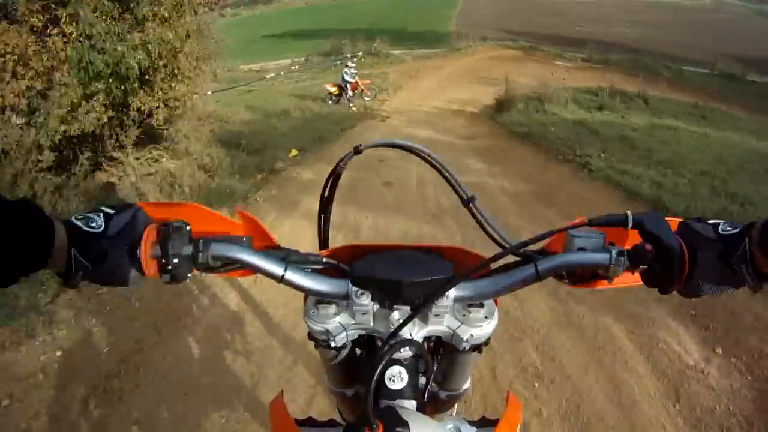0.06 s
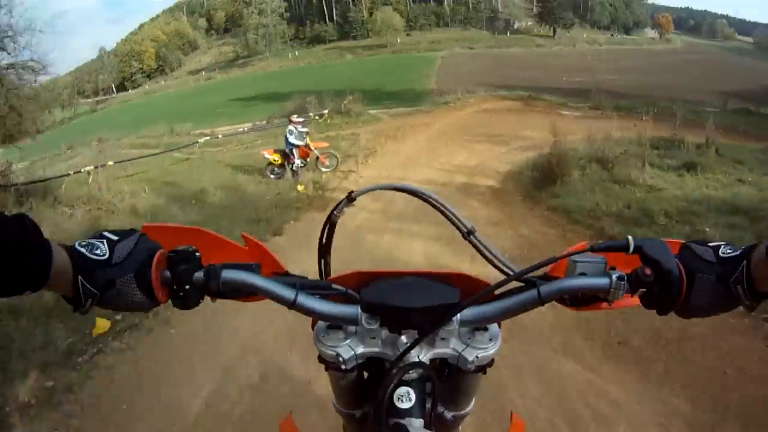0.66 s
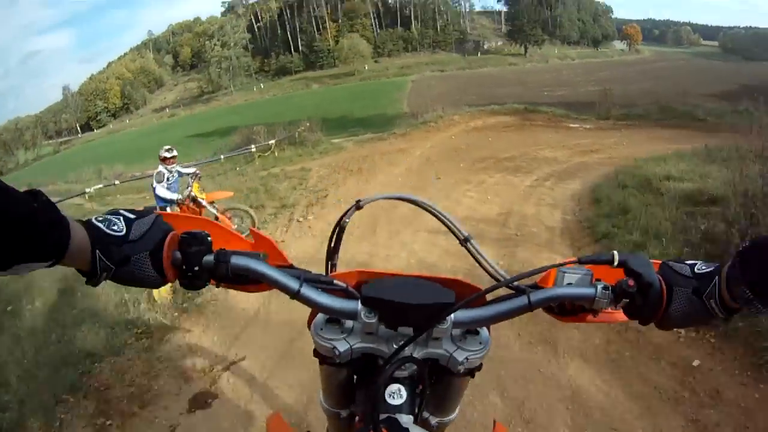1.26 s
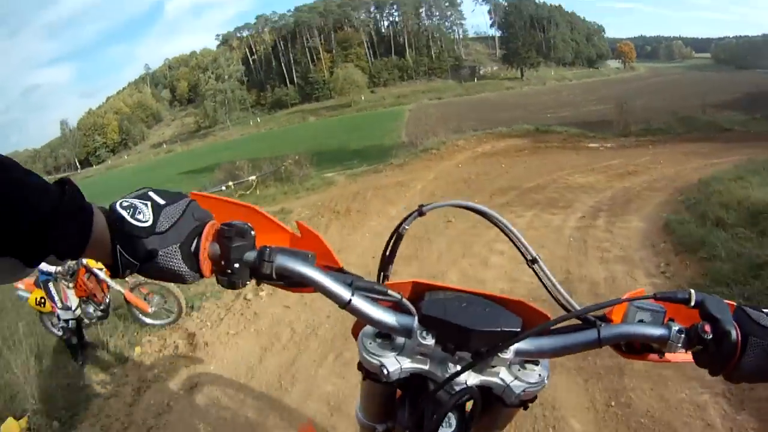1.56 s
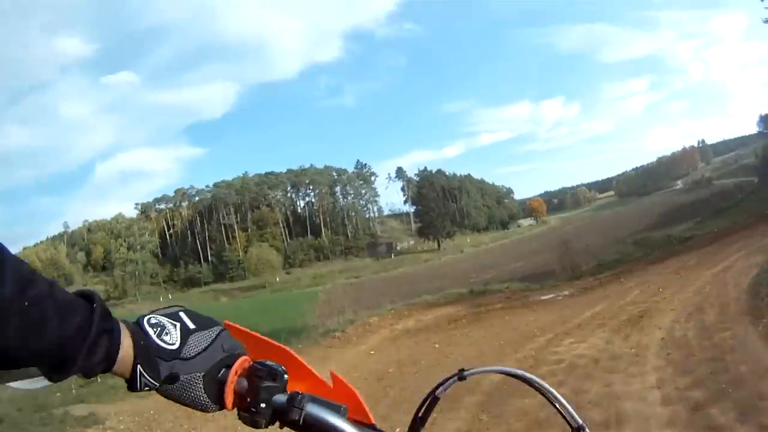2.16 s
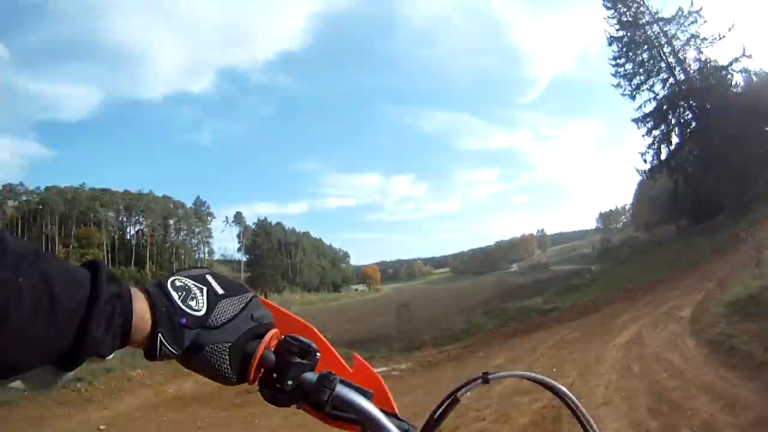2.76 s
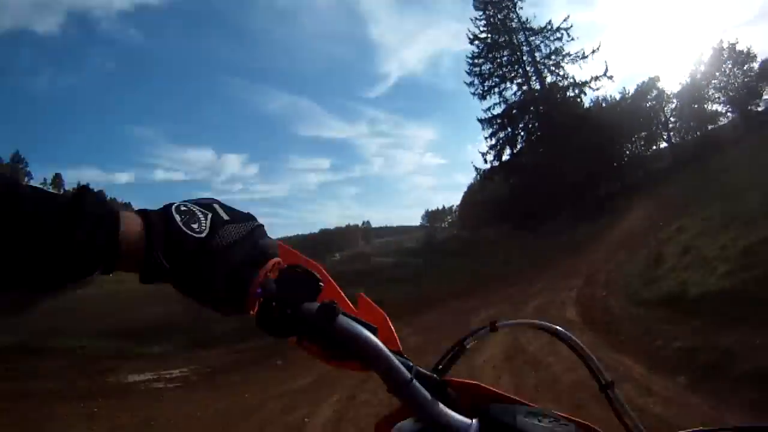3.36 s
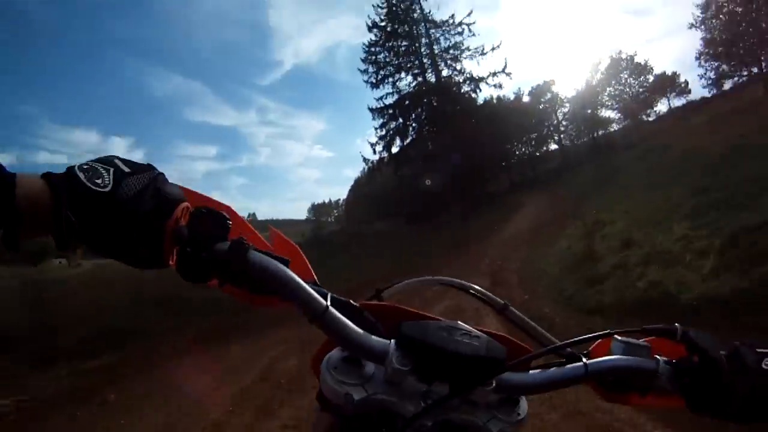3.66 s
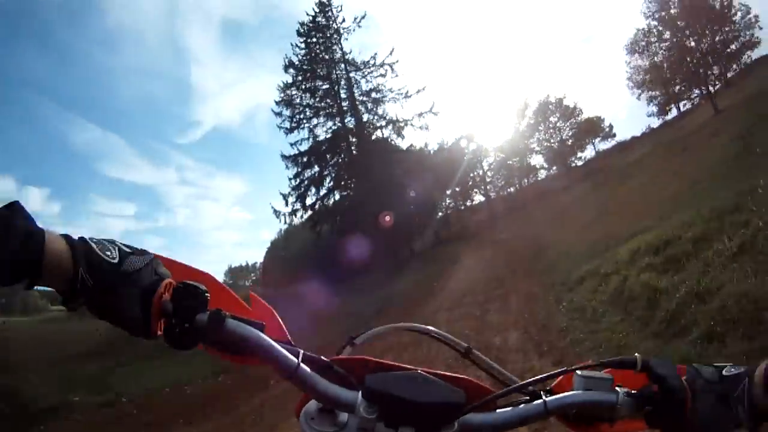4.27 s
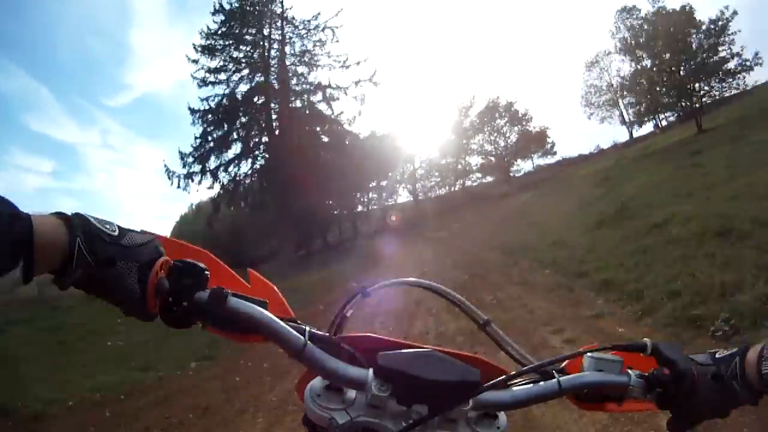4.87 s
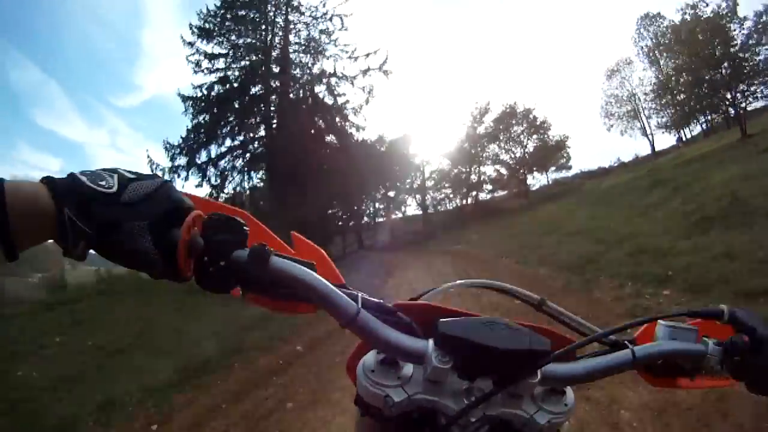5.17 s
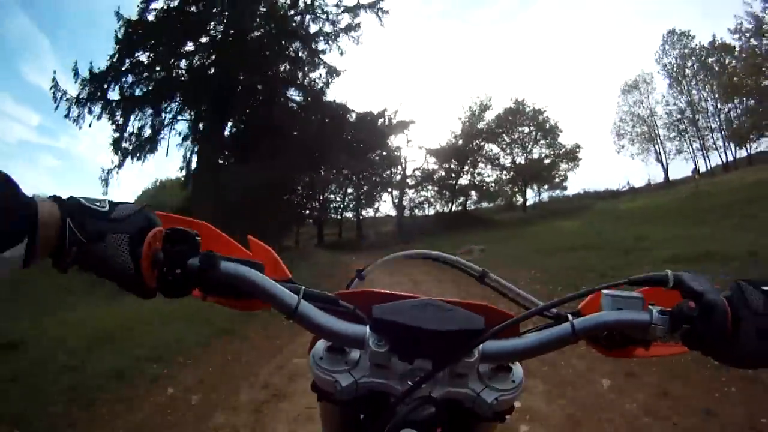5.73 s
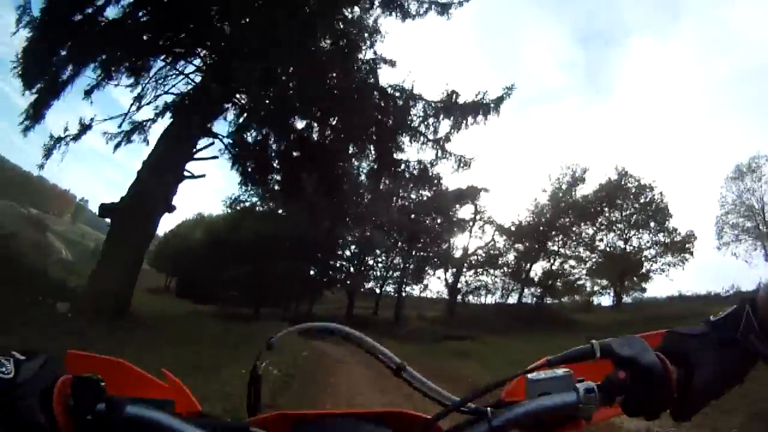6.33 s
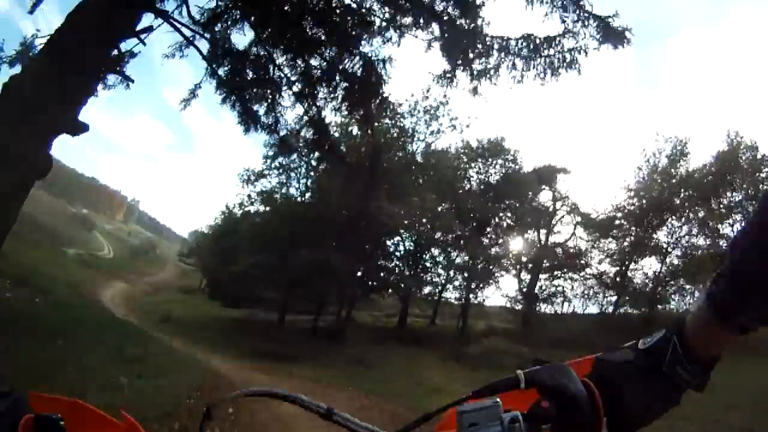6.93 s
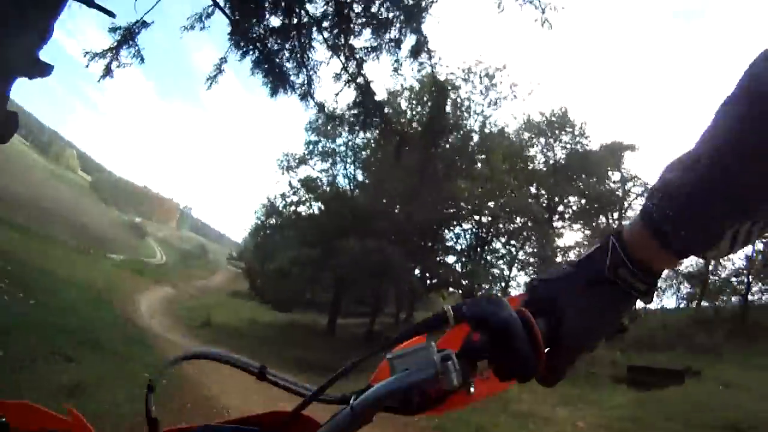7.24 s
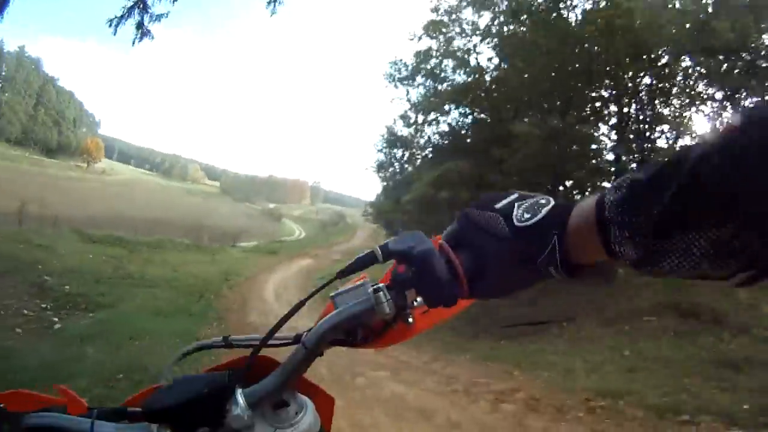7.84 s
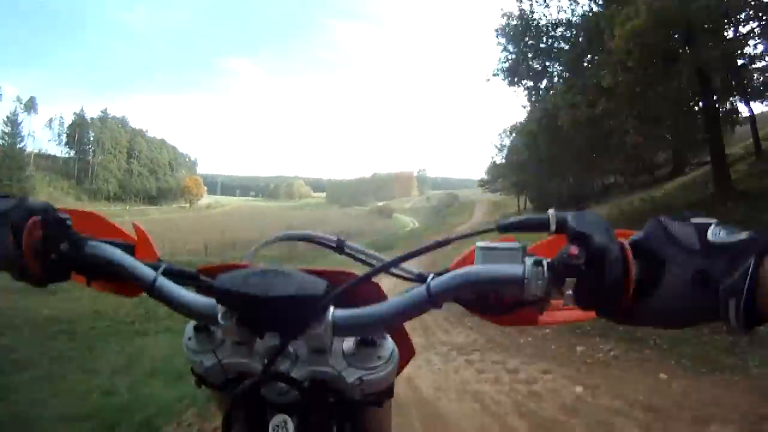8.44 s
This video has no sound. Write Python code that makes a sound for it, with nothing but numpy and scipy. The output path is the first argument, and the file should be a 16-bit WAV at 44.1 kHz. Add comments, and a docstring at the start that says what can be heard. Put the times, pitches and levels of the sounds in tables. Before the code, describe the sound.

A two-stroke dirt bike is heard close up from a microphone on the rider, with low, lumpy wind buffeting and a thin treble fizz. For the first 3.4 seconds it coasts, its engine humming and gradually slowing while the frame rattles. The slack chain slaps sharply, most densely in the first second, and the exhaust pops irregularly, more often from about 2.4 seconds. At 3.4 seconds the throttle opens and the engine rises with a metallic rasp. It breaks briefly with a pop for a gear change around 4.4 seconds, then climbs higher, the revs flaring unevenly, to a peak at 6.1 seconds. The throttle shuts and the revs fall, with stronger wind, more chain slaps and a few soft thuds between 6.2 and 7.5 seconds. At 7.6 seconds the engine pops and pulls again, rising around 8.2 seconds and holding until the end.

```python
"""Wind buffeting and the hum and clatter of a coasting two-stroke dirt bike, heard from a cased camera
on the rider. The slack chain slaps over braking bumps and unburnt mixture pops in the pipe. The bike
pulls through two gears, coasts with a few thuds and pulls again: one pressure pulse per revolution
drives the resonances of airbox, exhaust and steel expansion chamber. The camera holds each sample at
12 kHz, and the spectral images this makes are heard as a thin treble fizz."""
import sys
import numpy as np
from scipy import signal
from scipy.fft import rfft, irfft
from scipy.io import wavfile
from scipy.ndimage import uniform_filter1d

SR = 44100
rng = np.random.default_rng(int(sys.argv[2]) if len(sys.argv) > 2 else 0)


def bounce(signal):
    """Save signal as a 16-bit WAV file at the path given by the first command-line argument."""
    frames = np.transpose(np.atleast_2d(signal))
    limited = np.clip(frames, -1, 1)
    pcm = np.round(limited * 32767).astype(np.int16)
    wavfile.write(sys.argv[1], SR, pcm)


N = 383669
T = np.arange(N) / SR

# Levels in the tables are relative; a spectrum gives only the shape of a filter.
# trend of the engine speed, climbing in each pull: t/s, speed/(rev/s)
SPEED_TREND = [(0, 57), (.33, 55), (.6, 43.5), (.95, 46), (1.28, 54), (1.6, 48), (1.8, 50), (2.08, 41.5),
               (3.28, 35.5), (3.45, 45.8), (3.77, 54), (4.31, 75.1), (4.48, 58.9), (4.95, 65.1),
               (5.5, 75.2), (6.11, 89.1), (6.45, 61), (6.69, 57), (6.84, 46), (7.2, 39), (7.6, 40),
               (7.645, 50), (8.04, 50.9), (8.25, 57.4), (8.34, 73.5), (8.7, 74.1)]
# the rear wheel spins up over a bump, or bites: t/s, added speed/(rev/s), half length/s
WHEEL_FLARES = [(3.657, 2.5, .053), (3.755, -2, .055), (4.139, 2.1, .028), (4.687, 3.2, .055),
                (4.824, 5.8, .046), (5.034, 8.2, .071), (5.229, 13.3, .055), (5.372, 11.8, .04),
                (5.581, 7.6, .081), (5.731, 8.2, .047), (5.867, 10.8, .038), (5.956, 6.3, .029),
                (6.046, 5.3, .026), (8.156, 13.3, .055), (8.416, 3.1, .017), (8.548, -5.5, .037)]
# the coasting hum swells as it passes through the airbox resonance: f/Hz, level/dB
HUM_RESPONSE = [(72, -28), (87, -29), (99, -20.5), (110, -20), (122, -21.5), (140, -18.5), (172, -43)]
# pipe resonances rung by stray firings: f/Hz, bandwidth/Hz, level/dB
PIPE_MODES = [(129, 51, -0.5), (289, 73.4, 6), (476, 200, -7)]
# rumble of frame and tyres: f/Hz, level/dB
RUMBLE_SPECTRUM = [(76, -22), (130, 1), (210, -4), (304, -1), (364, -8.5), (446, -2), (483, -10),
                   (539, -7.5), (709, -29.5), (850, -24.5), (1100, -50), (1870, -120)]
# resonances of cylinder and engine cases: f/Hz, bandwidth/Hz, level/dB
CASE_MODES = [(1328, 67, -2), (1584, 53, 4.5), (2110, 490, -8.5)]
# clatter of chain and frame: f/Hz, level/dB
CLATTER_SPECTRUM = [(410, -24), (700, -27.5), (884, -7), (1160, -4), (1270, 1.5), (1450, -5), (1570, 0.5),
                    (1700, -1.5), (2510, -0.5), (2770, -7), (3730, -7.5), (4340, -19.5), (4880, -17.5),
                    (6000, -29), (7800, -47), (13200, -120)]
# strength of the wind on the camera case: t/s, level/dB
WIND_LEVELS = [(0, -14), (.58, -21.5), (.85, -31), (1.15, -24.5), (2.25, -21.5), (2.8, -26.5),
               (3.15, -29.5), (4.22, -39), (4.36, -25.5), (4.6, -33), (5.1, -25.5), (6.0, -32.5),
               (6.24, -20.5), (7.15, -23), (7.53, -23), (7.72, -25), (8.03, -27), (8.25, -39), (8.7, -23)]
# wind buffeting: f/Hz, level/dB
BUFFET_SPECTRUM = [(12, 3), (25, -11), (50, -2), (90, -5.5), (160, -10), (300, -26.5), (700, -28)]
# hard chain slaps: t/s, level/dB
HARD_SLAPS = [(0.236, -7.5), (0.3092, -7.5), (0.424, -5), (0.5568, -6), (0.589, -4.5), (0.634, 1),
              (0.6727, -9), (0.712, -8), (0.751, -3.5), (0.793, -1.5), (0.832, -8), (0.8776, 1),
              (0.9233, -6), (0.9694, -1.5), (1.181, -9.5), (1.5665, -1.5), (1.6253, -11), (1.922, -9.5),
              (1.9905, -9), (2.478, -14), (2.597, -5.5), (2.653, -9.5), (2.733, -15), (2.913, -13),
              (2.9505, -7.5), (6.4557, -8), (6.4935, -7.5), (6.7488, -10.5), (6.805, -11.5), (6.861, -8),
              (6.936, -11), (6.9908, -2), (7.1062, -5), (7.8052, -14)]
# ring of a chain slap: f/Hz, level/dB
SLAP_SPECTRUM = [(200, 6), (450, 13), (750, -15.5), (1300, 1.5), (1700, 3.5), (2500, 4), (2800, -1.5),
                 (3500, 2.5), (4300, -9), (5000, -11.5), (6000, -19.5)]
# stray firings banging in the pipe: t/s, level/dB
STRAY_FIRINGS = [(0.44, -5), (0.637, -10), (0.796, -7), (0.968, -7), (1.066, 1.5), (1.234, -2), (1.566, -3),
                 (1.904, -2.5), (2.384, -6), (2.556, -2), (2.707, -6), (2.732, -1.5), (2.892, -7),
                 (2.958, 2), (3.095, -4), (3.146, -5), (3.254, -7), (3.28, 1), (3.374, -4.5), (3.44, 0),
                 (4.4625, 2), (7.602, -3), (7.633, 2.5), (7.674, -1), (7.852, 1), (7.895, 2)]
# brief dips in level, mostly after a bang (a negative depth is a lift): t/s, depth/dB
LEVEL_DIPS = [(.48, 2.5), (1.073, 7.5), (1.59, 2), (2.79, 5), (2.975, 6.5), (3.3, 8), (4.484, 7.5),
              (6.11, -2.5), (6.517, 8.5), (6.615, 3), (7.03, 6), (7.155, 5.5), (7.648, 2.5)]
# spans of open throttle: start t/s, end t/s, honk level/dB, rasp level/dB
PULL_SPANS = [(3.449, 4.305, -18, -29.5), (4.451, 6.11, -17, -28.5), (7.638, 8.75, -15, -29.5)]
# the rider's hand during the pulls: t/s, throttle opening (0-1)
THROTTLE_OPENING = [(3.45, 0.27), (3.55, 0.3), (3.85, 0.8), (4.05, 0.51), (4.3, 0.34), (4.48, 0.8),
                    (5.0, 0.39), (5.24, 0.5), (5.3, 0.32), (5.36, 0.54), (5.88, 0.89), (6.1, 0.65),
                    (7.645, 0.32), (7.82, 0.13), (7.93, 0.48), (8.25, 0.53), (8.4, 0.33), (8.7, 0.42)]
# low resonances of the airbox: f/Hz, level/dB
AIRBOX_SPECTRUM = [(55, -35), (80, -14.5), (100, -9.5), (150, -9), (175, -6), (205, -7.5), (245, 3),
                   (300, -2.5), (321, -11.5), (340, -5.5), (365, -11.5), (400, -19), (520, -17)]
# higher resonance of the exhaust: f/Hz, level/dB
EXHAUST_SPECTRUM = [(330, -29), (390, -14), (430, 8.5), (465, 10), (505, 3.5), (540, -15), (620, -16),
                    (700, -33), (850, -29.5), (1100, -41)]
# wall resonances of the steel expansion chamber: f/Hz, bandwidth/Hz, level/dB
STEEL_MODES = [(1660, 34, -4.5), (1965, 112, 3), (2288, 296, -4)]
# metallic rasp of the firings: f/Hz, level/dB
RASP_SPECTRUM = [(440, -34), (750, -16), (797, -7), (949, -7), (1090, -7.5), (1440, -4.5), (1990, -2.5),
                 (2190, 0), (2450, -3), (2720, -11), (3410, -7.5), (3720, -13.5), (5040, -22), (6000, -30),
                 (7800, -77), (13200, -120)]
# the suspension takes a hole: t/s, level/dB
LANDINGS = [(6.204, -3.5), (6.498, 1.5), (7.296, -11), (7.515, -7)]

PULL_REVS, COAST_REVS, IDLE_REVS = 65, 45, 38  # reference speeds in rev/s


def from_db(db):
    """Amplitude ratio of a level."""
    return 10 ** (np.asarray(db) / 20)


def rms_one(x):
    """Normalisation to unit rms."""
    return x / np.sqrt(np.mean(x ** 2) + 1e-20)


def evened(x, window_s):
    """Normalisation to unit rms over a sliding window."""
    return x / np.sqrt(np.abs(uniform_filter1d(x * x, int(window_s * SR))) + 1e-12)


def in_time(rows):
    """Linear interpolation of each column at every sample."""
    s, *columns = np.transpose(rows)
    return [np.interp(T, s, c) for c in columns]


def drift(rate_hz):
    """Low-passed noise: a slow random fluctuation of unit rms."""
    step = 40  # samples per noise value
    r = np.exp(-2 * np.pi * rate_hz * step / SR)
    slow = signal.lfilter([1], [1, -2 * r, r * r], rng.standard_normal(N // step + 2002))[2000:]
    return np.interp(np.arange(N) / step, np.arange(len(slow)), rms_one(slow))


def coloured(x, spectrum, size=8192):
    """Minimum-phase filter of unit energy: follows a spectrum, falling 30 dB/octave past its ends."""
    hz, db = np.transpose(spectrum)
    octave, known = np.log2(np.arange(size // 2 + 1) * SR / size + 1), np.log2(hz)
    gain_db = np.interp(octave, known, db) - 30 * np.abs(octave - np.clip(octave, known[0], known[-1]))
    cepstrum = irfft(np.log(from_db(gain_db) + 1e-5))
    response = irfft(np.exp(rfft(2 * cepstrum[:size // 2], size)))
    return signal.oaconvolve(x, response / np.linalg.norm(response))[:N]


def resonate(x, modes, damping):
    """Modal superposition: parallel resonators of alternating sign; damping scales their bandwidths."""
    out = 0
    for k, (hz, width, db) in enumerate(modes):
        r = np.exp(-np.pi * width * damping / SR)
        poles = [1, -2 * r * np.cos(2 * np.pi * hz / SR), r * r]
        out = out + (-1) ** k * from_db(db) * signal.lfilter([1 - r, 0, r - 1], poles, x)
    return out


def engine_speed():
    """The firing frequency in rev/s: a trend with a Gaussian flare at each bump."""
    trend, = in_time(SPEED_TREND)
    return trend + sum(extra * np.exp(-((T - s) / half_s) ** 2) for s, extra, half_s in WHEEL_FLARES)


def firings(turns, spread_db, jitter_s):
    """A pulse train, one per revolution; uneven strength and timing put noise between its harmonics."""
    at = np.flatnonzero(np.diff(np.floor(turns)) > 0)
    strength, delay = np.clip(rng.standard_normal((len(at), 2)), -2, 2).T
    jittered = np.clip(at + (delay * jitter_s[at] * SR).astype(int), 0, N - 1)
    pulses = np.full(N, 1e-18)
    pulses[jittered] = from_db(strength * spread_db[at])
    return pulses


def once_a_turn(turns, depth_db):
    """Amplitude modulation at the rotation frequency, of unit rms."""
    return rms_one(from_db(depth_db * np.cos(2 * np.pi * turns)))


def chamber(x, return_s, share):
    """Reflection in the expansion chamber smears each pulse without colouring it (an allpass)."""
    lag = int(return_s * SR)
    taps = np.zeros(lag + 1)
    taps[[0, lag]] = 1, share
    return signal.lfilter(taps[::-1], taps, x)


def pipe(x, muffler_hz, damping):
    """Pressure pulses excite the modes of the pipe; the silencer acts as a low-pass filter."""
    muffler = signal.butter(4, muffler_hz, fs=SR, output="sos")
    return signal.sosfilt(muffler, resonate(x, PIPE_MODES, damping))


def mechanical_clatter(speed, turns, shake, links_per_s=2500):
    """Impact noise: links strike sprockets and guides, and at low revs piston knock rings the cases."""
    links = (rng.random(N) < links_per_s / SR) * rng.standard_normal(N)
    contacts = rms_one(links) + 1.01 * rng.standard_normal(N)
    contacts *= from_db(2.16 * shake) * once_a_turn(turns, depth_db=2)
    knocks = rng.standard_normal(N) * once_a_turn(turns, depth_db=30)
    piston = .64 * (IDLE_REVS / speed) ** 4 * rms_one(resonate(knocks, CASE_MODES, damping=.96))
    return evened(rms_one(coloured(contacts, CLATTER_SPECTRUM)) + piston, window_s=.45)


def coasting(speed):
    """Unloaded, the engine hums at its second harmonic; weak firings ring the pipe, the frame rattles."""
    turns = np.cumsum(speed * (1 + .02 * drift(20))) / SR  # the revs stumble from turn to turn
    hum = np.sqrt(2) * (np.sin(4 * np.pi * turns) + .17 * np.sin(2 * np.pi * turns))
    hum *= from_db(np.interp(2 * speed, *np.transpose(HUM_RESPONSE)) + 2 * drift(22))
    pulses = firings(turns, spread_db=np.full(N, 2.6), jitter_s=np.full(N, .00025))
    gas = chamber(pulses, return_s=.00404, share=.28)
    burble = evened(pipe(gas, muffler_hz=750, damping=1.28), window_s=.079)
    shake = drift(18.2)  # the jolting of the frame drives both rumble and clatter
    jolts = rng.standard_normal(N) * from_db(3.3 * shake)
    rumble = evened(coloured(jolts, RUMBLE_SPECTRUM), window_s=.062)
    faster = speed - COAST_REVS
    return (hum + from_db(-17 - .1933 * faster) * (.56 * burble + .72 * rumble)
            + from_db(-27 - .13 * faster) * mechanical_clatter(speed, turns, shake))


def wind(pickup_db=-.5):
    """Turbulent pressure on the camera case gives a lumpy, low buffeting."""
    wind_db, = in_time(WIND_LEVELS)
    buffet = coloured(rng.standard_normal(N), BUFFET_SPECTRUM) * from_db(1.4 * drift(9.7))
    return from_db(wind_db + pickup_db) * rms_one(buffet)


def chain_slaps(load, taps_per_s=5, rise_s=.0034, decay_s=.0042, lag_s=.003, crack_s=.0009):
    """A distributed impact: the chain lands link by link, a swell of contacts topped by a crack."""
    slack = rng.random(N) < (1 - load) * taps_per_s / SR  # lighter taps while coasting
    tap_db = -16.5 + 3 * rng.uniform(-1, 1, N)
    swell, crack = np.zeros((2, N))
    for s, db in HARD_SLAPS + list(zip(T[slack], tap_db[slack])):
        near = slice(max(int((s - .03) * SR), 0), int((s + .08) * SR))
        age = T[near] - s - lag_s
        swell[near] += from_db(db) * np.exp(np.minimum(age / rise_s, -age / decay_s))
        crack[near] += from_db(db) * (age > 0) * np.exp(-np.abs(age) / crack_s)
    treble = signal.butter(2, 2600, "high", fs=SR, output="sos")
    bright = signal.sosfilt(treble, crack * rng.standard_normal(N))
    return from_db(-5) * coloured(swell * rng.standard_normal(N) + bright, SLAP_SPECTRUM)


def pops(lag_s=.00138):
    """Unburnt mixture bangs in the damped pipe; nonlinear steepening adds a crack to the hardest."""
    pulses = np.full(N, 1e-18)
    for s, db in STRAY_FIRINGS:
        pulses[int((s + lag_s) * SR)] = from_db(db)
    bangs = pipe(pulses, muffler_hz=804, damping=2.27)
    crack = signal.sosfilt(signal.butter(2, [500, 1700], "band", fs=SR, output="sos"), pulses ** 3)
    return from_db(-1) * pulses.max() * (bangs / np.abs(bangs).max() + .23 * crack / np.abs(crack).max())


def dips(onset_s=.012, recovery_s=.021):
    """Gain modulation: the level departs and recovers exponentially around each dip."""
    depths = (db * np.exp(np.minimum((T - s) / onset_s, (s - T) / recovery_s)) for s, db in LEVEL_DIPS)
    return from_db(-sum(depths))


def under_load(pickup_s=.016, shut_s=.048):
    """A trapezoidal envelope: 1 while the engine pulls, 0 while it coasts."""
    return sum(np.clip(np.minimum((T - start) / pickup_s + .5, (end - T) / shut_s), 0, 1)
               for start, end, *_ in PULL_SPANS)


def exhaust_bark(exhaust):
    """The upper harmonics of the exhaust pulses, smeared by a further reflection."""
    upper = signal.butter(4, 560, "high", fs=SR, output="sos")
    reflected = chamber(exhaust, return_s=.00298, share=.58)
    return evened(signal.sosfiltfilt(upper, reflected), window_s=.051)


def steel_rasp(pulses, speed, turns, decay_s=.008):
    """Forced vibration: each firing shakes the steel chamber alike, and its modes sing at high revs."""
    age = T[:SR // 25]
    shell = signal.oaconvolve(pulses, rng.standard_normal(len(age)) * np.exp(-age / decay_s))[:N]
    hiss = rng.standard_normal(N) * once_a_turn(turns, depth_db=-2.5)
    sing = .48 * (speed / PULL_REVS) ** 3 * evened(resonate(shell, STEEL_MODES, damping=1), window_s=.1)
    rasp = rms_one(coloured(rms_one(shell) + .9 * rms_one(hiss), RASP_SPECTRUM))
    return evened((rasp + sing) * from_db(1.6 * drift(35)), window_s=.12)


def pulling(speed, tyres_db=-31.5):
    """Source and filter: a firing every turn drives airbox, exhaust and steel, over the tyre rumble."""
    throttle = np.clip(in_time(THROTTLE_OPENING)[0], .02, 1)
    honk_db, rasp_db = in_time([(s, *levels) for start, end, *levels in PULL_SPANS for s in (start, end)])
    power = np.tanh(throttle / .22)  # saturates at a small opening
    turns = np.cumsum(speed) / SR
    easing = np.clip(-np.gradient(speed) * SR / 400, 0, .5)
    # firing is ragged when the revs drop, at low revs and on a small throttle
    ragged = np.maximum(easing, 1 / (1 + (speed / 50) ** 16)) + 2 * (1 - power) ** 2
    spread_db, jitter_s = .6 + 2 * ragged, .00003 + .00028 * ragged
    pulses = firings(turns, spread_db, jitter_s)
    gulps = firings(turns + .5, spread_db, jitter_s)  # air drawn half a turn later favours even orders
    gas = chamber(pulses, return_s=.0041, share=.55) + .0035 * rng.standard_normal(N)
    intake = chamber(gulps, return_s=.0041, share=.55)
    boom = evened(coloured(gas + .2 * intake, AIRBOX_SPECTRUM), window_s=.156)
    exhaust = coloured(gas, EXHAUST_SPECTRUM)
    honk = evened(exhaust, window_s=.25)
    rasp = steel_rasp(pulses, speed, turns)
    tyres = from_db(tyres_db) * rms_one(coloured(rng.standard_normal(N), RUMBLE_SPECTRUM))
    faster, closed = speed - PULL_REVS, 1 - throttle
    return (power * from_db(-15.5 + .0133 * faster) * boom
            + power ** 3 * from_db(honk_db - 5 * easing) * honk
            + from_db(-18 - 37 * closed) * exhaust_bark(exhaust)  # a wide throttle sharpens the pulses
            + from_db(rasp_db - .0086 * faster - 4 * closed) * rasp + tyres)


def thuds(half_s=.0019):
    """Each hard landing gives the camera one soft push, a Gaussian pulse with only low frequencies."""
    return -sum(from_db(db) * np.exp(-((T - s) / half_s) ** 2) for s, db in LANDINGS)


def scene():
    """Superposition of the sources; the load crossfades pulling and coasting at one shared speed."""
    speed, load = engine_speed(), under_load()
    engine = load * pulling(speed) + (1 - load) * coasting(speed)
    return (dips() * (engine + chain_slaps(load) + pops() + thuds() + wind()))[None]


def record(dry, cutoff_hz=15600):
    """A zero-order hold at 12 kHz mirrors the spectrum about that rate; peaks clip, the top is cut."""
    coarse = np.clip(signal.resample_poly(dry, 40, 147, axis=1), -1, 1)
    held = signal.resample_poly(np.repeat(coarse, 4, axis=1), 147, 160, axis=1)[:, :N]
    return signal.sosfilt(signal.ellip(10, .2, 80, cutoff_hz, fs=SR, output="sos"), held)


dry = scene()
out = record(dry)
bounce(out)
```